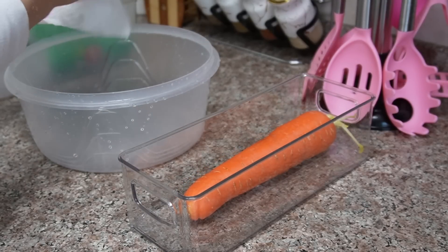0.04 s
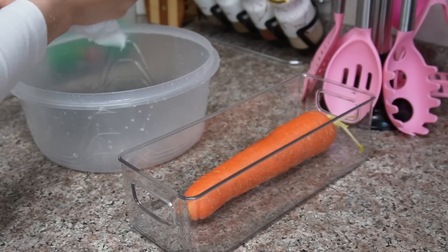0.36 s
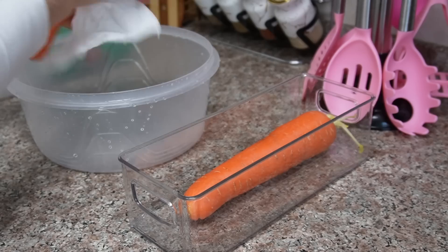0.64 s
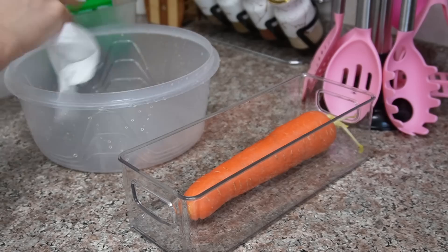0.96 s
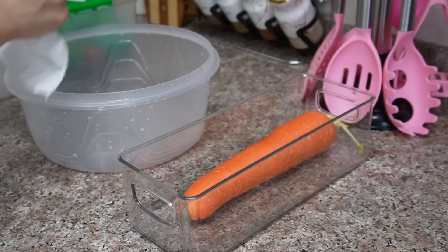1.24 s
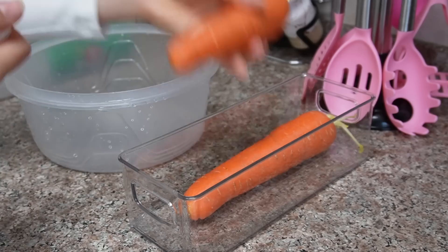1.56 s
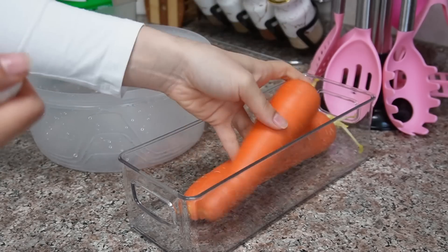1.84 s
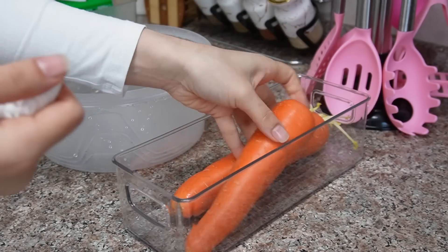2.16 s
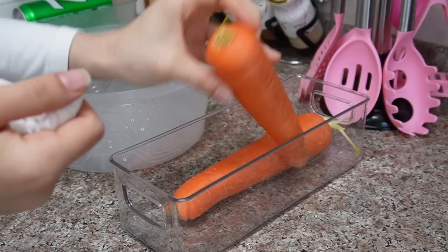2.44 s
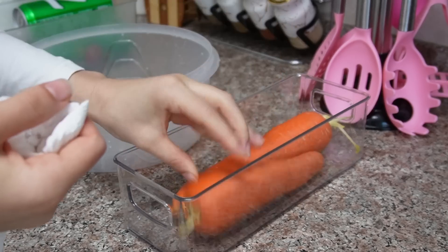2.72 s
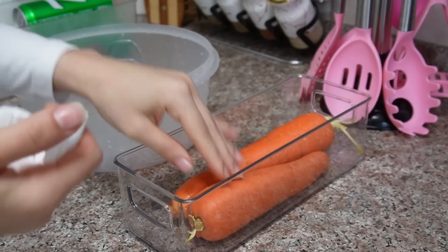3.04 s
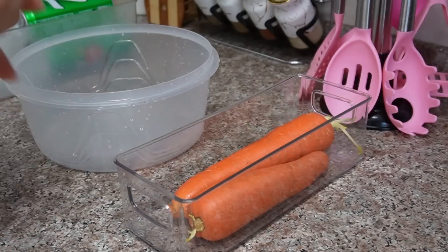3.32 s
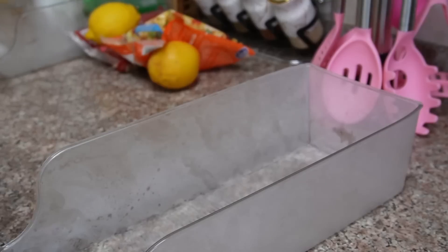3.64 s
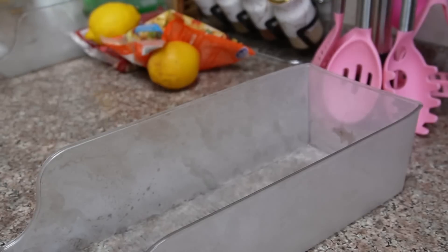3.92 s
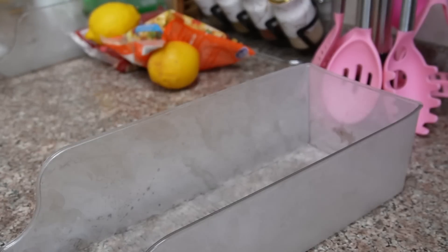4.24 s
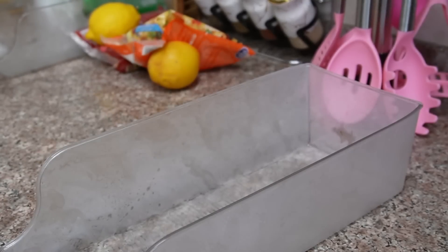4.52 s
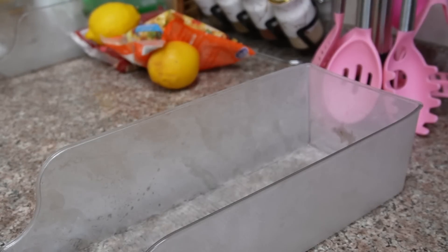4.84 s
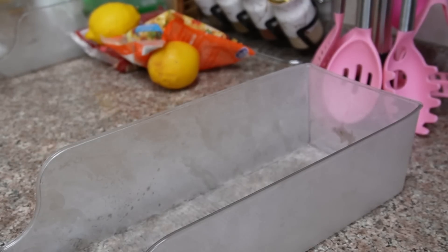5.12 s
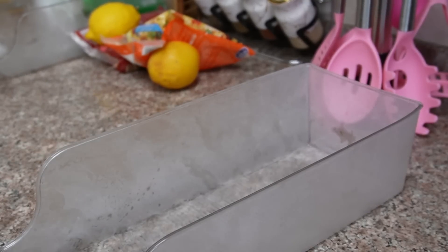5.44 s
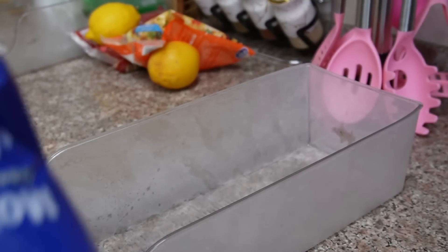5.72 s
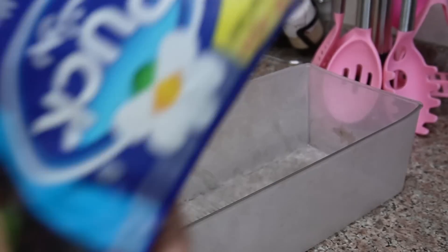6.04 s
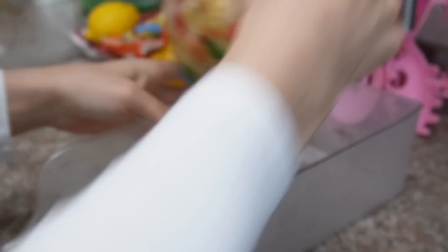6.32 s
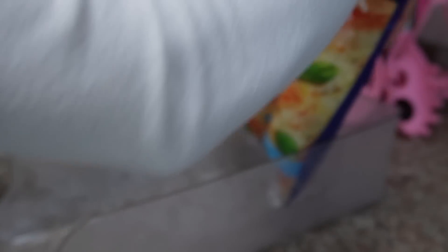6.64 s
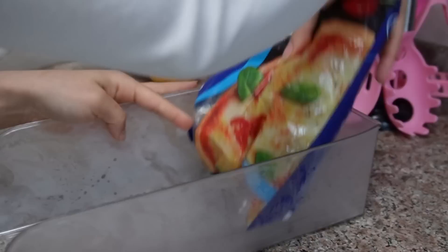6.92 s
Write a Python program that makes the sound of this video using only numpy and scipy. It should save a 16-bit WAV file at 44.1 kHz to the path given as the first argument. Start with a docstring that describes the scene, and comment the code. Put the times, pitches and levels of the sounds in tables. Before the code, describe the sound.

In a small kitchen, a paper towel rubs a wet carrot in soft, scratchy strokes. The carrot knocks into a hard plastic tray, then tumbles with a quick, hollow clatter. After a short pause, a crisp plastic bag is gathered up close to the microphone and pushed into a bin, crackling densely with sharp snaps and hollow crumples. An appliance whines faintly underneath.

```python
"""On a kitchen counter, a paper towel rubs a wet carrot with stick-slip friction. The carrot then knocks
and tumbles into a hard plastic tray, each impact exciting the tray's modes. Later a crisp plastic bag is
gathered up close by and pushed into a bin: its film buckles in dense crackles, sharp snaps and hollow
crumples. The small hard room reverberates, an appliance whines faintly, and a limiter holds the peaks."""
import sys
import numpy as np
from scipy import signal
from scipy.fft import rfft, irfft, next_fast_len
from scipy.io import wavfile
from scipy.ndimage import uniform_filter1d, minimum_filter1d, map_coordinates

SR = 44100
rng = np.random.default_rng(int(sys.argv[2]) if len(sys.argv) > 2 else 0)


def int16_out(signal):
    """Quantize to a 16-bit WAV file."""
    q = np.round(np.clip(np.atleast_2d(signal).T, -1, 1) * 32767)
    wavfile.write(sys.argv[1], SR, q.astype(np.int16))


N = 307377

# spectra of buckling film and of the finest creases and fibres: f/Hz, relative density/dB
FILM_SPECTRUM = [(290, -35.5), (500, -5.5), (718, -7.5), (1050, -4.5), (1140, 0.5), (2070, 2), (4470, 0.5),
                 (5970, -5), (12900, -27), (15100, -58), (16000, -59)]
SIZZLE_SPECTRUM = [(2500, -64), (5500, 0.5), (8000, -1.5), (11000, -8.5), (16000, -24)]
# effort on the bag as it is gathered up, and as it is pushed into the bin: t/s, level/dB
GATHER_EFFORT = [(3.638, -27), (3.663, -19), (3.763, -28), (3.992, -20.5), (4.132, -22.5), (4.177, -16.5),
                 (4.446, -19), (4.536, -24), (4.571, -18.5), (4.78, -28.5), (4.875, -20), (4.945, -25),
                 (5.184, -23), (5.374, -32.5), (5.394, -26), (5.604, -20.5), (5.623, -19), (5.708, -28.5),
                 (5.758, -26), (5.893, -42.5), (5.963, -43)]
STOW_EFFORT = [(6.432, -26), (6.546, -18), (6.576, -22.5), (6.606, -16.5), (6.731, -24), (6.761, -21.5),
               (6.786, -22), (6.935, -21), (6.96, -18.4)]


def amp(db):
    """Amplitude ratio of a level in decibels."""
    return 10 ** (np.asarray(db) / 20)


def unit(x):
    """Normalisation to an rms of 1."""
    return x / np.sqrt(np.mean(x ** 2) + 1e-20)


def along(points, hz):
    """Interpolation of (f/Hz, value) points on a logarithmic frequency axis."""
    f, values = np.transpose(points)
    return np.interp(np.log(hz + 1), np.log(f + 1), values)


def envelope(points):
    """Amplitude envelope through (t/s, level/dB) points, silent outside them."""
    return amp(np.interp(np.arange(N) / SR, *np.transpose(points), left=-120, right=-120))


def wobble(rate):
    """Smooth random modulation: a spline through `rate` knots a second."""
    knots = rng.standard_normal(int(N * rate / SR) + 4)
    return map_coordinates(knots, [np.arange(N) * rate / SR])


def add(track, s, sound):
    """Superposition of a sound on a track, starting at s seconds."""
    i = round(s * SR)
    track[..., i:i + sound.shape[-1]] += sound[..., :N - i]


def filtered(x, response):
    """Zero-phase filtering: the spectrum is multiplied by a function of frequency."""
    n = x.shape[-1]
    size = next_fast_len(n + 4096, True)
    return irfft(rfft(x, size) * response(np.fft.rfftfreq(size, 1 / SR)), size)[..., :n]


def coloured(x, spectrum, size=2048):
    """Minimum-phase filtering to (f/Hz, level/dB) points; folding the cepstrum makes it causal."""
    cepstrum = irfft(np.log(amp(along(spectrum, np.fft.rfftfreq(size, 1 / SR)))))
    cepstrum[1:size // 2] *= 2
    cepstrum[size // 2 + 1:] = 0
    impulse_response = irfft(np.exp(rfft(cepstrum)))
    return signal.oaconvolve(x, impulse_response[None], axes=1)[:, :x.shape[-1]]


def spread(pair):
    """Interchannel coherence: two independent signals become alike in the bass, apart in the treble."""
    # likeness of left and right: f/Hz, correlation
    coherence = [(300, 0.99), (1000, 0.95), (2000, 0.92), (4000, 0.77), (8000, 0.57), (13000, .05)]

    def weights(hz):
        angle = np.arccos(np.clip(along(coherence, hz), -1, 1)) / 2
        return np.array([np.cos(angle), np.sin(angle)])

    mid, side = filtered(pair, weights)
    return np.array([mid + side, mid - side])


def noise(count):
    """A diffuse field of white stereo noise."""
    return spread(rng.standard_normal((2, count)))


def room_tail():
    """Reverberation: the kitchen's impulse response, of energy about 1, decays longest in the bass."""
    # reverberation time: f/Hz, T60/s
    decay_times = [(150, 0.89), (700, 0.34), (2000, 0.53), (5000, 0.5), (14000, 0.28)]
    hz, t, bands = signal.stft(noise(SR // 2), SR, nperseg=256)
    decay = amp(-60 * t / along(decay_times, hz)[:, None])
    tail = signal.istft(bands * decay, SR, nperseg=256)[1][:, :SR // 2]
    return tail / np.linalg.norm(tail[0])


def flurries(rate, life_s):
    """Shot noise: the power of small collapses that start at once and decay exponentially; mean 1."""
    starts = (rng.random(N) < rate / SR) * rng.exponential(size=N)
    power = signal.lfilter([1], [1, -np.exp(-1 / (life_s * SR))], starts)
    return power / power.mean()


def crackle(spectrum, rate, spread_db, wash_db, clump_db):
    """A Poisson process of unequal clicks, surging in flurries over the wash of their echoes; rms 1."""
    hits = rng.random(N) < rate / SR
    sizes = amp(spread_db * np.minimum(rng.exponential(size=N), 4))
    clicks = spread(hits * sizes * np.array([rng.choice([-1, 1], N), rng.standard_normal(N)]))
    surge = np.sqrt(1 + amp(clump_db) ** 2 * flurries(rate=90, life_s=0.0036))
    return unit(coloured(surge * (unit(clicks) + amp(wash_db) * noise(N)), spectrum))


def background():
    """Broadband room noise under phase-modulated tones: an appliance's whine and a faint low ring."""
    # room air: f/Hz, relative density/dB
    air_spectrum = [(15, -46), (25, -20), (53, -2), (72, -13), (145, -4.5), (263, -10), (911, -6),
                    (1190, -7.5), (1330, -10), (1650, -14), (2410, -10.5), (2840, -13.5), (3620, -13.5),
                    (3920, -15), (16000, -37)]
    # the appliance's spectral lines: f/Hz, level/dB
    whine_lines = [(50, -69), (142, -69), (3650, -69.5), (8193, -75.5), (8979, -78.5)]
    # envelopes of its strongest line and of the low ring: t/s, level/dB
    whistle_levels = [(0, -58.5), (.9, -62), (1.35, -66), (1.6, -55), (1.8, -65), (2.4, -62), (3.3, -69),
                      (3.57, -54), (7, -63)]
    ring_levels = [(.42, -76), (.47, -52), (.63, -55), (.72, -61.5), (1.6, -67)]
    t = np.arange(N) / SR
    whine = sum(amp(db + 2.6 * wobble(3.5)) * np.sin(2 * np.pi * hz * t + 0.58 * wobble(40))
                for hz, db in whine_lines)
    whistle = envelope(whistle_levels) * np.sin(2 * np.pi * 2417 * t + 0.32 * wobble(49))
    ring = envelope(ring_levels) * np.sin(2 * np.pi * 291 * t + 0.3 * wobble(17))
    air = amp(-51.5) * unit(coloured(noise(N), air_spectrum, size=8192))
    return air + np.sqrt(2) * (whine + whistle + ring)


def towel():
    """Stick-slip friction: paper fibres rub and catch on the wet carrot; later a sleeve brushes past."""
    # strokes of the towel and of the sleeve: t/s, level/dB
    strokes = [(0.0, -48.5), (0.104, -54.5), (0.366, -38), (0.454, -46.5), (0.518, -43), (0.6, -49),
               (0.664, -44), (0.684, -53), (0.772, -35.5), (0.986, -38), (1.072, -50), (1.086, -45),
               (1.132, -54), (1.19, -44), (1.224, -49), (1.256, -42.5), (1.432, -54.5), (1.5, -55)]
    sleeve = [(3.22, -57), (3.356, -48.5), (3.5, -45), (3.62, -62)]
    # rubbing paper: f/Hz, relative density/dB
    paper_spectrum = [(600, -29), (1200, -12), (1900, -0.5), (3000, -0.5), (4800, -0.5), (7000, -10),
                      (12000, -20), (16000, -24)]
    # wet paper catching and slipping: t/s, level/dB, f/Hz
    slips = [(.5, -43.5, 1740), (.653, -48, 1900), (.728, -41, 2390), (1.18, -50, 4500),
             (1.251, -37.5, 5450), (1.63, -55, 4860)]
    rubbing = envelope(strokes)
    briskness = rubbing / amp(-37)  # 1 in a brisk stroke
    fibres = crackle(paper_spectrum, rate=2500, spread_db=3, wash_db=4.5, clump_db=-7)
    fizz = crackle(SIZZLE_SPECTRUM, rate=3000, spread_db=2, wash_db=-2, clump_db=-5)
    out = (rubbing + envelope(sleeve)) * fibres + amp(-41) * briskness ** 1.57 * fizz
    t = np.arange(SR // 5) / SR
    for s, db, hz in slips:
        swish = unit(coloured(noise(len(t)), [(hz / 2, -25), (hz, 0), (hz * 2, -25)]))
        add(out, s, swish * amp(db + 3.5 - 60 * t / 0.21) * (1 - np.exp(-t / 0.0022)))
    return out


def contacts():
    """Inelastic rebound: the carrot lands, and any bounces follow ever sooner and softer."""
    # landings: t/s, level/dB, contact cut-off/Hz, crack/dB, wall tone/dB, rebounds, loss per rebound/dB
    landings = [(1.837, -40, 990, -35, 0.5, 0, 1), (1.9115, -11, 1140, -16, 4, 0, 1),
                (1.929, -12.5, 1370, -32, -2, 0, 0), (1.944, -22, 1360, -28, 5, 2, 0),
                (2.2193, -20.5, 770, -35, -1, 0, 0), (2.3951, -35.5, 950, -20, 1, 0, 0),
                (2.5449, -29.5, 970, -30, -4, -0.5, 0), (2.5808, -6, 2600, -7.5, -10, 4.5, 0.55),
                (2.73, -11, 4000, -9, -11, 0, 0), (2.7636, -13.5, 1110, -20, 10, 0, 0),
                (2.786, -4, 2450, -9, -4, 0, 0), (2.801, -5, 2960, -13, -18, 2.5, 0.9),
                (2.893, -9.5, 1410, -27, -2, 0, 0), (2.907, -5, 1900, -12, -10, 0.5, 0),
                (2.923, -10, 1840, -34, -14, 0, 0)]
    first_flight_s, restitution, softening = 0.032, 0.86, 0.95
    for s, db, contact_hz, crack_db, wall_db, rebounds, loss_db in landings:
        for k in range(round(rebounds) + 1):
            delay = first_flight_s * np.sum(restitution ** np.arange(k))
            yield s + delay, db - loss_db * k, contact_hz * softening ** k, crack_db - 0.5 * k, wall_db


def carrot_in_tray():
    """Impact excitation: each blow drives the tray's modes and the room; a soft one lacks treble."""
    # the tray's normal modes: f/Hz, level/dB, T60/s
    modes = [(252.5, -24.5, 0.64), (400, -18, 0.4), (541.3, -17, 0.4), (584, -18, 0.3), (809, -6.5, 0.31),
             (836, -13.5, 0.26), (901, -9, 0.28), (980, -30, 0.19), (1178, -13.5, 0.53), (1209, -9, 0.43),
             (1360, -12, 0.18), (1692, -5, 0.098), (1823, -10, 0.4), (2013, -4.5, 0.1), (2300, -21, 0.1),
             (2635, -8, 0.17), (2905, -10, 0.1), (4640, -18, .12)]
    # thud of tray and counter: f/Hz, relative density/dB
    thud_spectrum = [(35, -7), (70, 4.5), (130, -3), (230, -11), (450, -2), (650, 0.5), (900, 8),
                     (1250, 6.5), (1900, 2.5), (3000, -1.5), (4000, -5.5), (5000, -9.5), (8000, -11),
                     (16000, -14)]
    crack_spectrum = [(1000, 7), (5000, 8), (9000, -3), (16000, -33)]
    soft_contact_hz = 1150
    out, t = np.zeros((2, N)), np.arange(SR // 2) / SR
    mode_hz, mode_db, t60 = np.transpose(modes)[:, :, None]
    decay = amp(mode_db - 60 * t / t60) * (1 - np.exp(-t / 0.00023))
    sine, cosine = decay * np.sin(2 * np.pi * mode_hz * t), decay * np.cos(2 * np.pi * mode_hz * t)
    for s, db, contact_hz, crack_db, wall_db in contacts():
        strength = amp(rng.normal(0, 3.4, len(modes)))
        phase = rng.uniform(0, 2 * np.pi, len(modes))
        ring = (strength * np.cos(phase)) @ sine + (strength * np.sin(phase)) @ cosine
        thud = coloured(amp(31) * room_tail() + amp(-20 - 60 * t / 0.017) * noise(len(t)), thud_spectrum)
        lowpass = signal.butter(2, contact_hz, fs=SR, output="sos")
        # only slow, heavy blows push out the low notes
        highpass = signal.butter(1, contact_hz / 3.06, "highpass", fs=SR, output="sos")
        body = signal.sosfilt(np.vstack([lowpass, highpass]), amp(-6) * ring + thud)
        # the carrot lying against the wall damps its tone; a soft, heavy touch lowers it
        wall_hz = 980 * min(contact_hz / soft_contact_hz, 1.5) ** 0.37 * np.exp(rng.normal(0, 0.029))
        wall_envelope = amp(wall_db - 60 * t / 0.069) * (1 - np.exp(-t / 0.00049))
        wall = wall_envelope * np.sin(2 * np.pi * wall_hz * t)
        crack = amp(crack_db - 10.5 - 60 * t / 0.019) * noise(len(t)) + amp(crack_db - 3) * room_tail()
        add(out, s, amp(db) * (body + wall + coloured(crack, crack_spectrum)))
    return out


def radiation_highpass(x, corner_hz):
    """Radiation efficiency: thin film moves too little air to radiate low notes."""
    return signal.sosfilt(signal.butter(2, corner_hz, "highpass", fs=SR, output="sos"), x)


def effort_db(s):
    """The driving level: how hard the bag is worked at the given times."""
    # effort as the bag is lifted over to the bin: t/s, level/dB
    lift_effort = [(5.978, -38), (5.998, -23.5), (6.102, -21.5), (6.257, -36), (6.372, -39.5), (6.417, -34)]
    return np.interp(s, *np.transpose(np.vstack([GATHER_EFFORT, lift_effort, STOW_EFFORT])), left=-120)


def bag_rustle():
    """Buckling noise: film, panels and creases grow as powers of the effort; skids add a short hiss."""
    # film skidding over film: t/s, level/dB
    skids = [(3.64, -41), (3.93, -29), (4.605, -22), (4.965, -30.5), (5.232, -25), (5.393, -22),
             (6.612, -19.5), (6.722, -24), (6.955, -27)]
    time, t = np.arange(N) / SR, np.arange(SR // 2) / SR
    grip = amp(effort_db(time) + 21)  # 1 in a firm grip
    sizzle = amp(-35.5) * grip ** 1.53
    for s, db in skids:
        add(sizzle, s, amp(db - 60 * t / 0.19) * (1 - np.exp(-t / 0.0016)))
    # the bag's panels: f/Hz, relative density/dB
    panel_spectrum = [(25, -47), (55, -23), (100, -13), (180, -6), (400, 0), (750, 1), (1100, -1),
                      (2000, -15.5), (4000, -51)]
    film = crackle(FILM_SPECTRUM, rate=900, spread_db=3.8, wash_db=-2, clump_db=-2.5)
    panels = crackle(panel_spectrum, rate=330, spread_db=8, wash_db=1, clump_db=-5.5)
    creases = crackle(SIZZLE_SPECTRUM, rate=530, spread_db=6, wash_db=5.5, clump_db=5)
    panel_db = -31.5 + 3 * (time > STOW_EFFORT[0][0])  # fuller once the bag rubs against the bin
    return amp(-21) * grip * film + amp(panel_db) * grip ** 0.8 * panels + sizzle * creases


def bag_crumples():
    """Panel buckling: a whole panel pops through with a hollow note and a burst of rustle."""
    # popping panels: t/s, level/dB, f/Hz
    pops = [(3.709, -12.5, 836), (3.849, -15.5, 1000), (3.97, -5, 760), (4.061, -11, 1040),
            (4.171, -12.5, 800), (5.185, -8, 1268), (5.363, -16, 527), (5.481, -12, 1224),
            (5.616, -4.5, 1014), (5.655, -8, 1040), (5.716, -15.5, 427), (5.84, -17, 493),
            (6.521, -0.5, 1110), (6.632, -2.5, 606), (6.655, -7, 430), (6.767, -7, 595)]
    # their rustle: f/Hz, relative density/dB
    hollow_spectrum = [(50, -26), (110, -11), (220, -3.5), (450, -2.5), (700, 2), (1100, 3),
                       (2500, 0.5), (6000, -18), (16000, -51)]
    out, t = np.zeros((2, N)), np.arange(SR // 5) / SR
    for s, db, hz in pops:
        burst = unit(coloured(noise(len(t)), hollow_spectrum)) * amp(-7.5 - 60 * t / 0.082)
        note = np.sin(2 * np.pi * hz * t) * amp(-1 - 60 * t / 0.033)
        air_hz = 450 * np.exp(rng.normal(0, 0.12))
        trapped_air = np.sin(2 * np.pi * air_hz * t) * amp(-17.5 - 60 * t / 0.14)
        add(out, s, amp(db) * (burst + note + trapped_air) * (1 - np.exp(-t / 0.0032)))
    return radiation_highpass(out, corner_hz=70)


def lesser_snaps(rate=20, candidates=120):
    """A random point process: about `rate` creases snap a second, louder under greater effort."""
    position, lottery = rng.random((candidates, 2)).T
    level_scatter, pitch_scatter, tick_scatter = rng.standard_normal((candidates, 3)).T
    start, length = GATHER_EFFORT[0][0], STOW_EFFORT[-1][0] - GATHER_EFFORT[0][0]
    s = start + length * position
    db = effort_db(s) + 15.5 + 3.5 * level_scatter
    hz = 2720 * 2 ** (0.58 * pitch_scatter)
    flutter_db, tick_db = np.full(candidates, -17.5), -35 + 2 * tick_scatter
    rows = np.column_stack([s, db, hz, flutter_db, tick_db])
    return list(rows[lottery < rate * length / candidates])


def bag_snaps():
    """Snap-through: a crease flips in about one cycle with a tick; the film flutters, the room echoes."""
    # the loudest creases: t/s, level/dB, f/Hz, relative flutter/dB, relative tick/dB
    loud_snaps = [(3.6439, -7.5, 1850, -8.5, -22), (3.6604, -2, 4200, -16.5, -24),
                  (3.7885, -1.5, 3400, -18, -37), (3.919, 5.5, 3300, -15.5, -28),
                  (4.049, -9, 3800, -25, -14), (4.203, -4, 3400, -7, -35), (4.3398, 4, 2090, -18, -32),
                  (4.5676, -2, 1800, -19, -30), (4.611, -1.5, 2370, -15, -13), (4.8372, -6, 2180, -29, -33),
                  (4.8615, 2.5, 3530, -16, -26), (5.029, -4, 2540, -16, -38), (5.1243, -1, 2040, -17, -41),
                  (5.1889, -5, 1940, -5, -18), (5.2886, -5.5, 3100, -12, -26),
                  (5.3939, -4.5, 2530, -13.5, -11), (5.488, -1, 3650, -22, -17),
                  (5.5622, -6, 3140, -14, -12), (5.6129, 2.5, 3000, -16, -35), (5.6573, -2, 1950, -14, -13),
                  (5.7584, -3, 2640, -24, -43), (5.9205, -13, 1760, -25, -39),
                  (5.9913, 3.5, 2800, -40, -44), (6.0475, -7, 1900, -18, -36), (6.0623, -6, 2200, -24, -37),
                  (6.076, -2, 2900, -26, -14), (6.2937, -9.5, 2680, -9, -24), (6.3959, -9, 3050, -12, -30),
                  (6.4347, 3, 3860, -16.5, -20), (6.4872, -2, 3320, -7.5, -13), (6.523, -1, 2600, -12, -28),
                  (6.6024, 6, 4250, -26, -16), (6.722, 1.5, 7000, -23, -10), (6.746, 7, 3720, -15.5, -14),
                  (6.8246, 5.5, 2900, -15, -18)]
    out, t = np.zeros((2, N)), np.arange(SR // 3) / SR
    rise_s = 0.0005
    from_peak = t[:SR // 100] - rise_s
    for s, db, hz, flutter_db, tick_db in list(loud_snaps) + lesser_snaps():
        phase = rng.uniform(0, 2 * np.pi) + rng.normal(0, 0.033, (2, 1))
        pulse = np.exp(-hz * np.maximum(-5 * from_peak, 2 * from_peak))
        flip = pulse * np.cos(2 * np.pi * hz * from_peak + phase)
        tick = unit(radiation_highpass(noise(len(from_peak)), corner_hz=6500))
        tick *= amp(tick_db + 1 - 60 * np.abs(from_peak) / 0.0084) * (from_peak >= 0)
        echo = amp(0.5) * signal.fftconvolve(flip + amp(-2.5) * tick, room_tail(), axes=1)[:, :len(t)]
        # the flutter dies fast; its echo hangs on
        flutter = amp(flutter_db - 1 - 60 * t / 0.024) + amp(flutter_db - 17 - 60 * t / 0.23)
        snap = echo + flutter * unit(coloured(noise(len(t)), FILM_SPECTRUM))
        snap[:, :len(from_peak)] += amp(5) * flip + tick  # direct sound
        add(out, s - rise_s, amp(db) * snap)
    return radiation_highpass(out, corner_hz=220)


def scene():
    """Superposition of the sources; a level difference sets the bag a little to the left."""
    bag = (bag_rustle() + bag_snaps() + bag_crumples()) * amp([[0.35], [-0.35]])
    return bag + towel() + carrot_in_tray() + background()


def record(dry):
    """Peak limiting by a fast, smoothed gain, followed by band limiting."""
    ceiling_db, top_hz = -0.7, 16000
    needed = np.minimum(1, amp(ceiling_db) / (np.abs(dry).max(axis=0) + 1e-9))
    gain = uniform_filter1d(minimum_filter1d(needed, size=61), size=61)
    return filtered(dry * gain, lambda hz: hz < top_hz)


dry = scene()
out = record(dry)
int16_out(out)
```